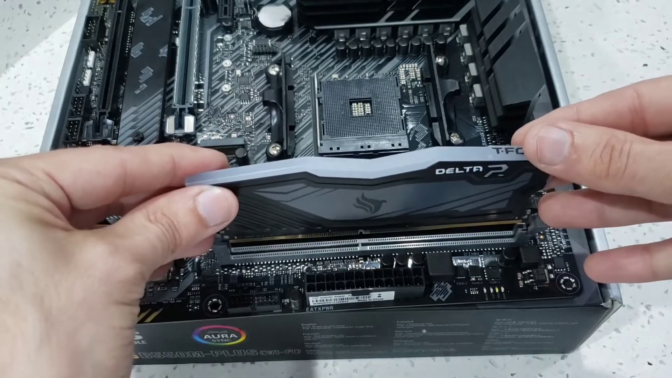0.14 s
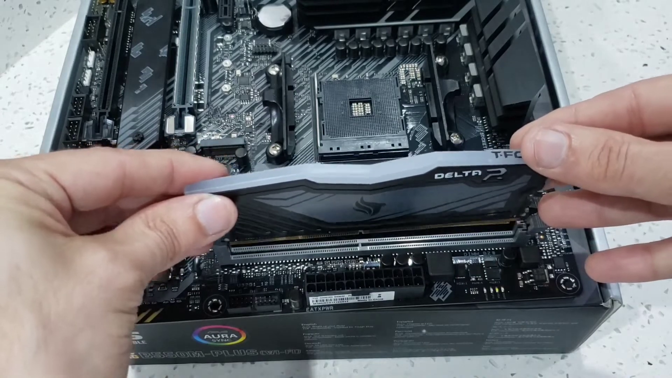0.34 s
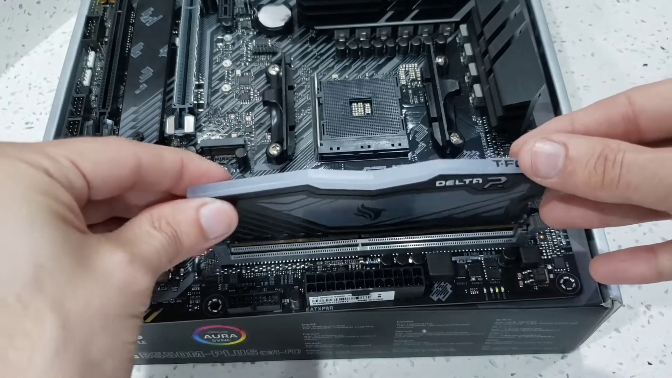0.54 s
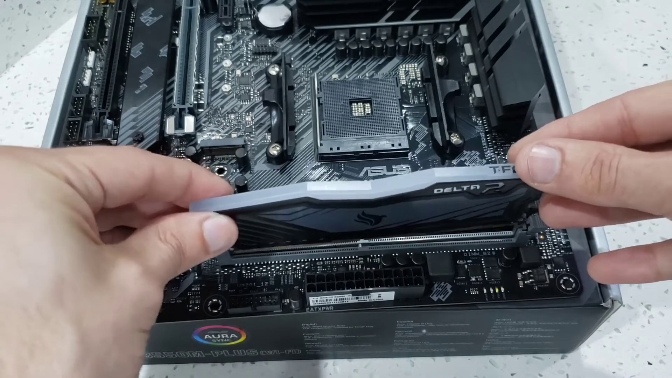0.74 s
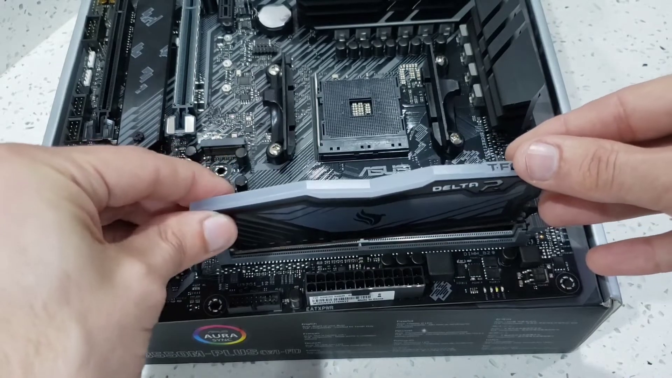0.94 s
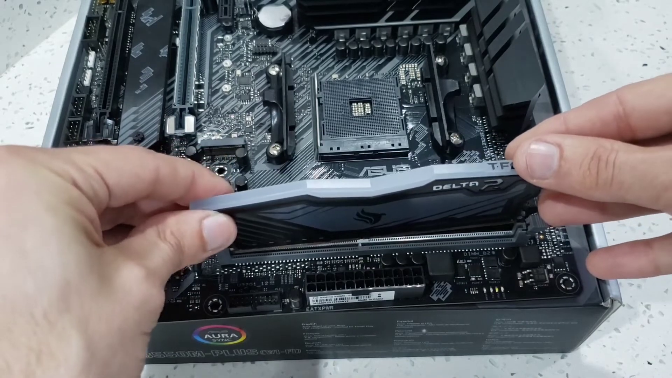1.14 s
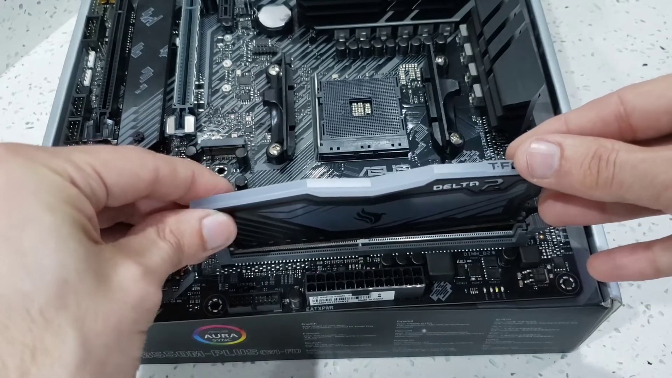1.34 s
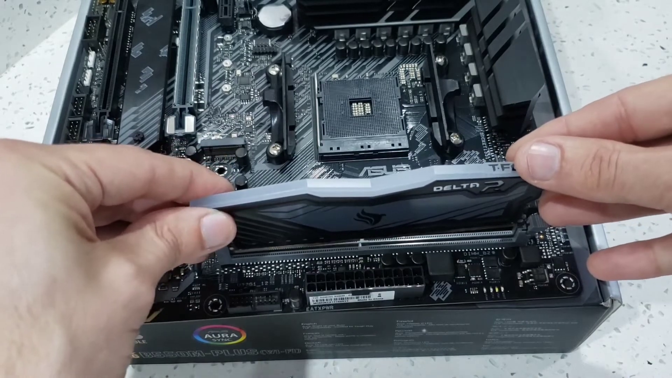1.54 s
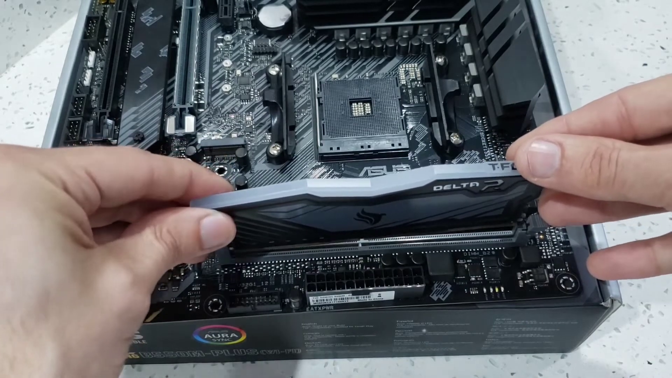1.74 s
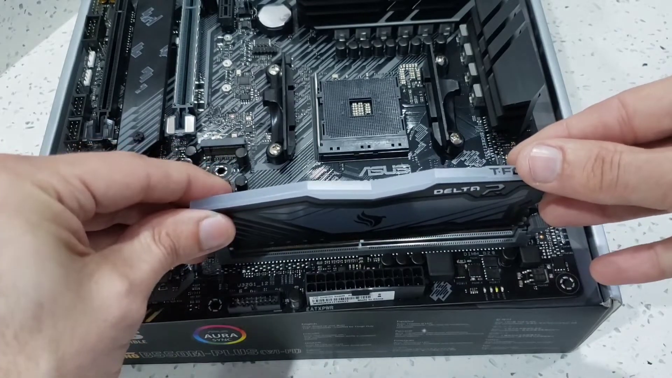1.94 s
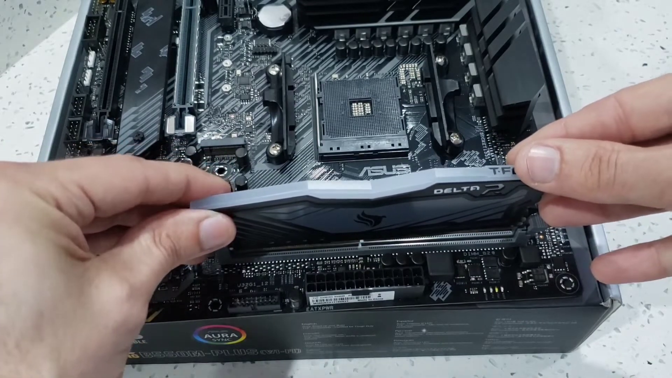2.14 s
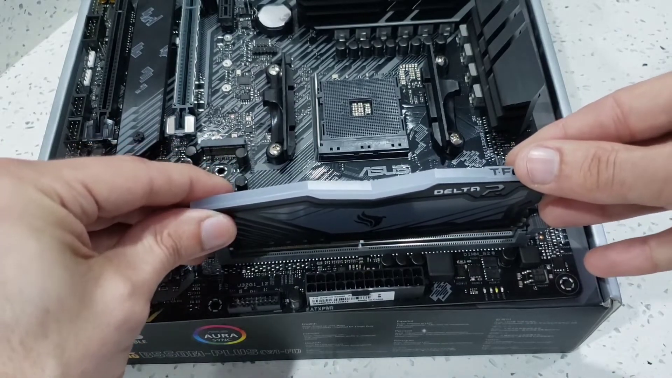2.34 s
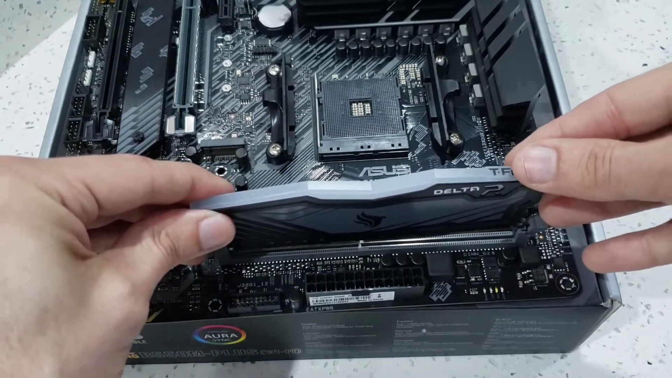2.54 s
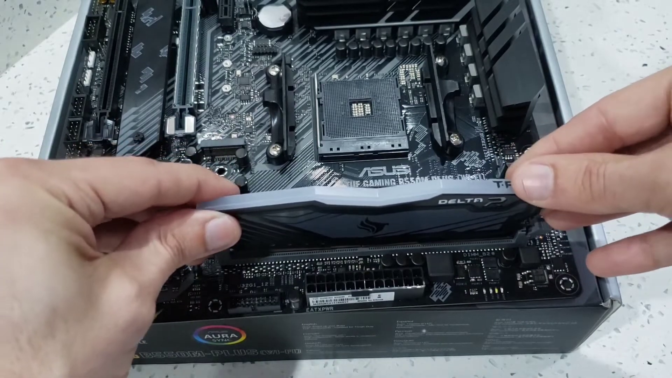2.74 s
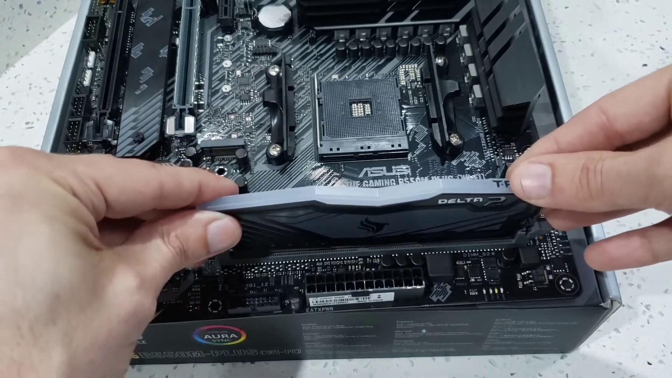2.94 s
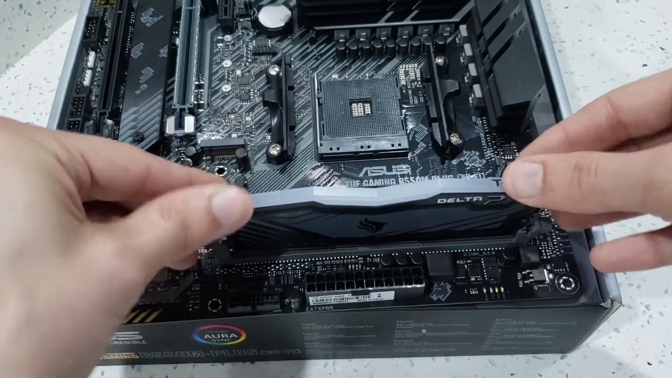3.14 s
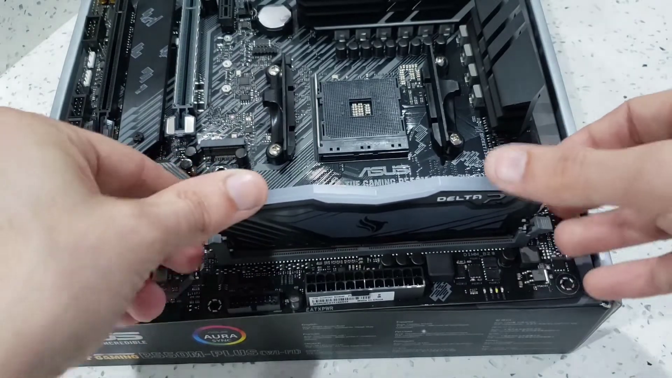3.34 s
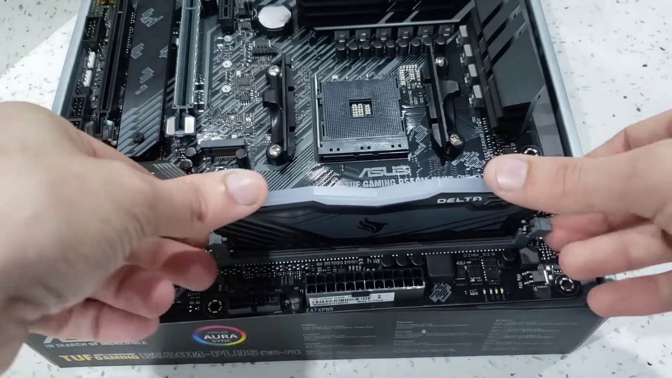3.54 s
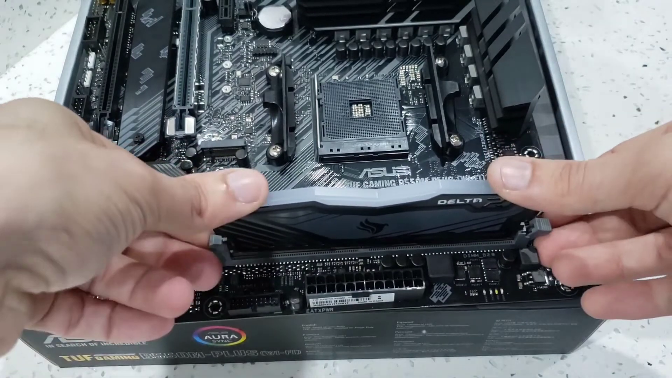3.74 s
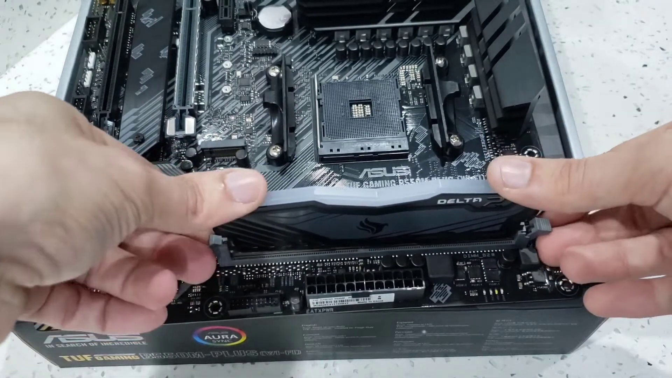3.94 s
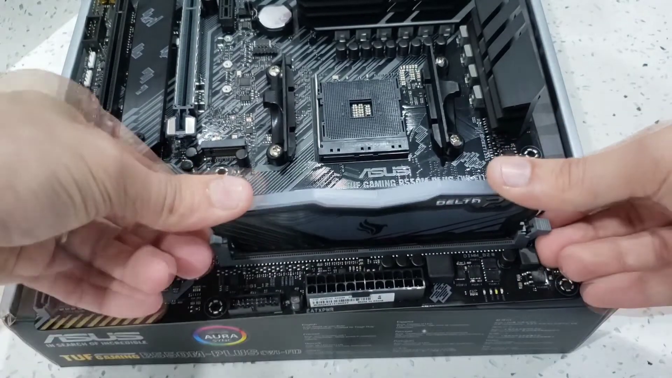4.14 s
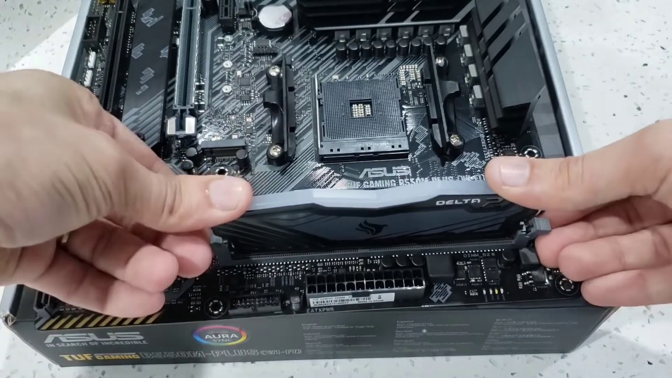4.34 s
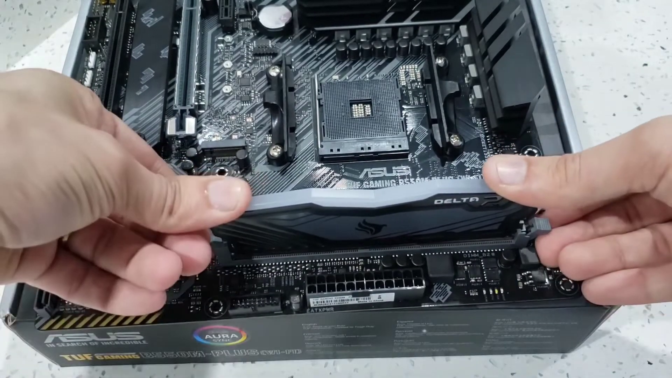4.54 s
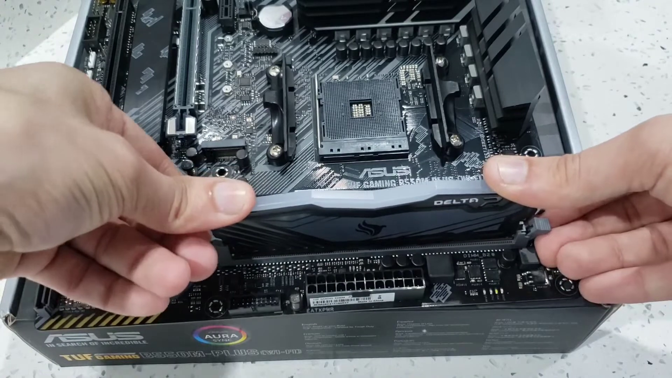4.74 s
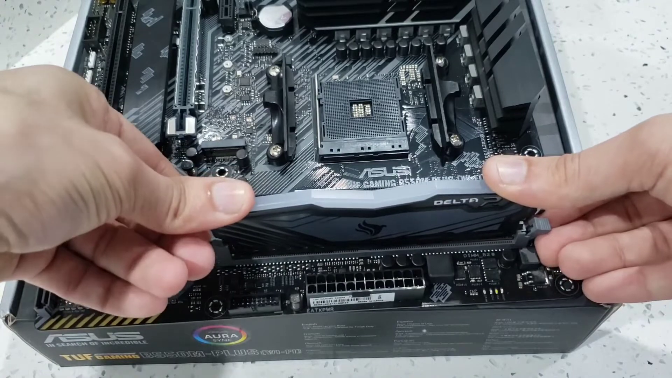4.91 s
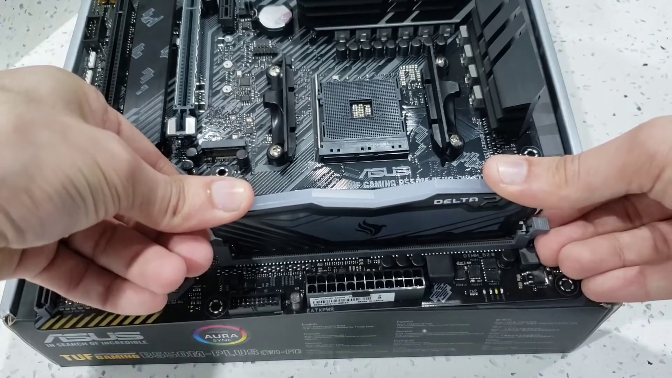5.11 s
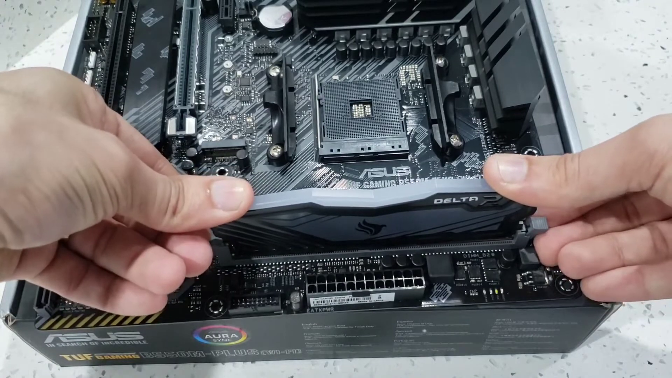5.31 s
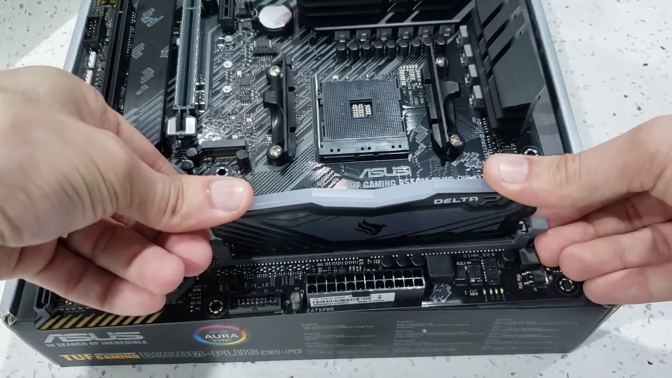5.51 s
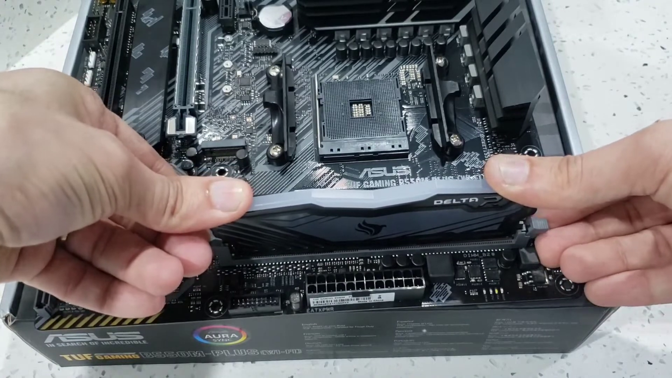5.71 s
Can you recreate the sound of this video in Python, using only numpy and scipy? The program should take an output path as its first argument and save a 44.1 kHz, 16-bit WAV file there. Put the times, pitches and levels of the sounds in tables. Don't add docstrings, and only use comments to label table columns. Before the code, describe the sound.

Soft plastic taps and scrapes on a circuit board lead to two sharp latch snaps in a hard-walled room with faint hum.

```python
import sys
import numpy as np
from scipy import signal
from scipy.fft import rfft, irfft, next_fast_len
from scipy.io import wavfile
from scipy.ndimage import uniform_filter1d, map_coordinates

SR = 44100
rng = np.random.default_rng(int(sys.argv[2]) if len(sys.argv) > 2 else 0)


def output_pcm(signal):
    pcm = np.clip(np.atleast_2d(signal).T, -1, 1) * 32767
    wavfile.write(sys.argv[1], SR, np.round(pcm).astype(np.int16))


def makeup_ratio(level_db):
    decades = np.asarray(level_db, float) / 20
    return 10 ** decades


N = 258867


def rms_one(x):
    return x / np.sqrt(np.mean(x ** 2) + 1e-20)


def at_hz(points, hz):
    points = np.array(points)
    return np.interp(np.log(hz + 1e-9), np.log(points[:, 0]), points[:, 1])


def level_curve(rows):
    s, level_db = np.transpose(rows)
    return np.interp(np.arange(N) / SR, s, level_db, left=-150, right=-150)


def drift(rate_hz):
    steps = int(N / SR * rate_hz) + 3
    return map_coordinates(rng.standard_normal(steps), [np.arange(N) / SR * rate_hz], order=3)


def band(x, low_hz, high_hz):
    return signal.sosfilt(signal.butter(2, [low_hz, high_hz], "band", fs=SR, output="sos"), x)


def high_pass(x, hz):
    return signal.sosfilt(signal.butter(4, hz, "high", fs=SR, output="sos"), x)


def ring(clicks, hz, t60):
    decay, w = makeup_ratio(-60 / (t60 * SR)), 2 * np.pi * hz / SR
    return signal.lfilter([0, np.sin(w)], [1, -2 * decay * np.cos(w), decay ** 2], clicks + 1e-18)


def click(s):
    return np.arange(N) == int(s * SR)


def struck(modes, s):
    return sum(makeup_ratio(level_db) * ring(click(s), hz, t60) for hz, level_db, t60 in modes)


# f/Hz, share in common (0 to 1)
PORT_LIKENESS = [(60, .97), (130, .9), (290, .8), (640, .6), (1410, .06), (3100, 0)]


def stereo_noise(spectrum, size):
    padded = next_fast_len(size)
    hz = np.fft.rfftfreq(padded, 1 / SR)
    alike = np.clip(at_hz(PORT_LIKENESS, hz), 0, 1)
    mid, side = rfft(rng.standard_normal((2, padded)))
    both = np.sqrt(1 + alike) * mid + np.sqrt(1 - alike) * side * [[1], [-1]]
    return rms_one(irfft(both * makeup_ratio(at_hz(spectrum, hz)), padded)[:, :size])


def plastic_contacts(contacts, colour, t60, chatter_s, lowest_hz):
    out, size = np.zeros((2, N)), SR // 25
    fade = np.exp(-np.arange(size) / SR / chatter_s)
    body, treble = 0, 0
    mode_hz = np.linspace(1100 ** .5, 16800 ** .5, 80) ** 2
    for hz in mode_hz * makeup_ratio(.06 * rng.standard_normal(80)):
        slips = rng.standard_normal((len(contacts), 2, size)) * fade
        mode = makeup_ratio(at_hz(colour, hz)) * ring(slips, hz, t60 * (4000 / hz) ** .25)
        if hz < 11000:
            body = body + mode
        else:
            treble = treble + mode
    body = high_pass(body, lowest_hz)
    body, treble = (x / np.abs(x).max(axis=2, keepdims=True) for x in (body, treble))
    for (s, peak_db, left_db, right_db), low, high in zip(contacts, body, treble):
        start = int(s * SR)
        beamed = makeup_ratio([[left_db], [right_db]]) * high
        out[:, start:start + size] += makeup_ratio(peak_db) * (low + beamed)
    return out


SHADED_TREBLE_DB = -6.5


def bounced(contacts, count, gap_s, growth, fade_db_per_s, treble_db):
    last_s, last_db, _ = contacts[-1]
    later = np.cumsum(gap_s * growth ** np.arange(count))
    rows = list(contacts) + [(last_s + s, last_db - fade_db_per_s * s, treble_db) for s in later]
    return [(s, peak_db, min(SHADED_TREBLE_DB + (peak_db < -38) * 6, 0), right_db)
            for s, peak_db, right_db in rows]


# t/s, peak level/dB, treble level/dB
FIRST_LATCH_CONTACTS = [
    (4.5505, -39, 4),
    (4.552, -38, 6),
    (4.5535, -37, 5),
    (4.5568, -16, -9),
    (4.5573, -16, 8),
    (4.5579, -16, 9),
    (4.559, -17, 2),
    (4.5602, -17, -2),
    (4.5613, -15, -4),
    (4.5628, -16, -2),
]
# f/Hz, level per mode/dB
FIRST_LATCH_COLOUR = [(1200, -30), (1600, -14), (2300, -7), (3200, -3), (4200, -3), (5500, 0), (7200, -6),
                      (9000, -6), (11000, -14), (12200, -15), (13200, -12), (14300, 0), (15000, -3),
                      (15700, -12), (16500, -30)]
# f/Hz, level/dB, t60/s
FIRST_LATCH_RING = [(2460, -46, .15), (4700, -48.5, .1), (12100, -45, 0.16), (14030, -44, .15),
                    (14600, -43.5, .15), (14840, -45.5, .12)]


def first_latch():
    contacts = bounced(FIRST_LATCH_CONTACTS, count=4, gap_s=.0016, growth=1.35, fade_db_per_s=650, treble_db=0)
    snap = plastic_contacts(contacts, FIRST_LATCH_COLOUR, t60=.008, chatter_s=.0004, lowest_hz=1200)
    return snap + struck(FIRST_LATCH_RING, 4.558) * makeup_ratio([[SHADED_TREBLE_DB], [0]])


# t/s, peak level/dB, treble level/dB
SECOND_LATCH_CONTACTS = [
    (5.1768, -26, 6),
    (5.1773, -21, 3),
    (5.1785, -23, 1),
    (5.1796, -23, -9),
    (5.1807, -21, -3),
]
# f/Hz, level per mode/dB
SECOND_LATCH_COLOUR = [(1350, -42), (1650, -16), (2200, -3), (2750, -14), (3300, -4), (4000, -4),
                       (4900, -13), (5800, -7), (7300, -11), (9000, -4), (11000, -7), (13000, -1),
                       (14300, -9), (15200, -1), (16000, 3), (16800, -2)]


def second_latch():
    contacts = bounced(SECOND_LATCH_CONTACTS, count=3, gap_s=.001, growth=1.6, fade_db_per_s=1000, treble_db=-1)
    return plastic_contacts(contacts, SECOND_LATCH_COLOUR, t60=.01, chatter_s=.0003, lowest_hz=1550)


# f/Hz, level/dB, t60/s
ARM_MODE = (2310, -52, 0.63)
# t/s, level/dB, share of the ring time
ARM_HITS = [
    (5.178, 0, 1.0),
    (3.666, -4, .3),
]
# pitch ratio, level/dB, share of the ring time
ARM_PARTNERS = [(1, -2, 1), (.97, 0, .25), (1.04, 0, .25), (1.017, -8, .8), (.985, -9, .6)]


def latch_arm():
    hz, level_db, t60 = ARM_MODE
    out = 0
    for s, hit_db, hit_share in ARM_HITS:
        for ratio, partner_db, partner_share in ARM_PARTNERS:
            tone = ring(click(s), hz * ratio, t60 * hit_share * partner_share)
            out = out + makeup_ratio(level_db + hit_db + partner_db) * tone
    return out


# t/s, peak level/dB, treble level/dB
SEATING_CONTACTS = [(2.584, -51, -15), (2.613, -45.5, -18), (2.698, -45, -3), (2.701, -51, -12),
                    (2.708, -42, -18), (2.714, -49, -18), (2.722, -57, -14), (2.731, -61, -15),
                    (2.749, -69, -15), (3.097, -56.5, -20), (3.6672, -52, -8), (3.669, -46.5, 7),
                    (3.681, -50, -16), (4.679, -43, 2), (4.684, -36.5, -10), (4.689, -41, -7),
                    (4.694, -48.5, -6)]
# f/Hz, level per mode/dB
SEATING_MODE_LEVELS = [(1200, 11.5), (1700, 12.5), (2300, 5), (3300, -10), (5000, 1.5), (7000, 10.5),
                       (10000, -29), (13000, 10), (16500, -22)]


def seating():
    contacts = [(s, peak_db, treble_db, treble_db) for s, peak_db, treble_db in SEATING_CONTACTS]
    return plastic_contacts(contacts, SEATING_MODE_LEVELS, t60=.022, chatter_s=.003, lowest_hz=800)


# f/Hz, level/dB, t60/s
MODULE_MODES = [(1800, -62, 0.046), (2150, -51.5, 0.044), (2390, -53, 0.076), (2510, -63, .05),
                (3520, -57, .04), (7100, -54, .04)]


def module_ring():
    return struck(MODULE_MODES, 3.6665)


# f/Hz, level/dB, t60/s
PANEL_MODES = [(334, -6.5, 0.054), (429.4, -1, 0.095), (462, -8, 0.11), (503, -13, 0.07)]
TABLE_MODES = [(64.6, -8.5, 0.075), (93, 5.5, 0.11)]
BOX_MODES = [(123.4, 2, 0.11), (140, -2, 0.13), (185.4, -10, 0.055)]
LID_MODES = [(254.5, -8, 0.088), (253.7, 1.5, 0.11), (299, 1.5, 0.036)]
BOARD_MODES = [(635.6, -8, 0.1), (661, -2, 0.07), (760, -0.5, 0.06), (900, -7, 0.03), (1030, -4.5, 0.055),
               (1190, -14, 0.025)]
TOUCH_KNOCKS = [(0.275, -61.5, 16.5, 10.5, -4), (0.385, -54.5, 5, 4.5, -8.5), (0.562, -54, 6.5, -3, -3),
                (0.586, -59, 17.5, 0.5, 6.5), (0.615, -48.5, -21, 0.5, -0.5), (0.719, -46.5, -28, 2, -7.5),
                (0.732, -53.5, -16, 3, -14), (0.749, -60, -14, 5.5, -10), (0.775, -59, -14, -2, -9),
                (0.81, -60.5, -17, 0.5, -10), (1.128, -52.5, -4, 2.5, -6.5), (1.264, -57, -7, 8, -8),
                (1.409, -48, -12, -19, -24), (1.468, -57, -20, -21, -26), (1.872, -51, -5.5, -2.5, -10.5),
                (1.9, -52.5, -11, 5, -20), (1.997, -48.5, -20, 4, -28)]
PUSH_KNOCKS = [(2.567, -53, 12, 11, -5), (2.582, -49, 6, 9.5, -6), (2.595, -52, 5, 11.5, 0),
               (2.609, -48, 16.5, 15, 0), (2.698, -50.5, -22, 11.5, 2), (2.708, -39, -22, -5, 1),
               (2.719, -40.5, 9, -12, -13), (2.733, -59, -8, -1, 3), (2.75, -55, -7, 0, -5),
               (2.957, -68, 20.5, 12, -5), (3.018, -52.5, 9.5, 2.5, -8), (3.098, -36.5, 4, -13, -9),
               (3.106, -36.5, -17, -22, -15), (3.652, -44.5, -9, -9, -5), (3.663, -37, -28, 1, -13),
               (3.675, -38, 8.5, 1, -13.5), (4.174, -56.5, -2, 2, -3)]
RECOIL_KNOCKS = [(4.553, -44.5, -4.5, -8, 1), (4.557, -26.5, -5.5, -19.5, -2.5),
                 (4.565, -36.5, -17, -3, -7.5), (4.589, -40, -1.5, -16.5, -10), (4.617, -46, -1, -10, -3),
                 (4.654, -53.5, 3.5, -16, 4), (4.68, -48, -4, -4, 1.5), (4.699, -55, 7, -15, -13),
                 (5.176, -51.5, 0.5, -2, 6.5), (5.824, -62.5, 2.5, -2, -5), (5.851, -56.5, -3.5, -4, -14.5)]
TABLE_OVER_BOX = [11, -6, 4.5]


def knocks():
    out, time = np.zeros((2, N + SR)), np.arange(SR // 4) / SR
    parts = (PANEL_MODES, TABLE_MODES, BOX_MODES, LID_MODES, BOARD_MODES)
    modes = np.array([(part, *mode) for part, table in enumerate(parts) for mode in table])
    part, hz, level_db, t60 = modes.T[:, :, None]
    part = part.astype(int)
    heavy = hz < 200
    for group, table_db in zip((TOUCH_KNOCKS, PUSH_KNOCKS, RECOIL_KNOCKS), TABLE_OVER_BOX):
        for s, panel_db, weight_db, lid_db, board_db in group:
            strength_luck, sign_luck, grip, delay_luck = rng.standard_normal((4, len(modes), 1))
            since = np.maximum(time - 0.002114 * np.abs(delay_luck) * (hz > 200), 0)
            reach_db = np.array([0, weight_db + table_db, weight_db, lid_db, board_db])[part]
            strength = makeup_ratio(panel_db + reach_db + level_db - 2.5 + strength_luck)
            strength = strength * np.where(heavy, -1, np.sign(sign_luck))
            swell = 1 - np.exp(-since * hz * 2.8)
            tone = np.sin(2 * np.pi * hz * (1 + .02 * grip) * since)
            rings = strength * swell * makeup_ratio(-60 * since / t60) * tone
            uneven = (grip * hz / 3000 * rings).sum(axis=0)
            start = int(s * SR)
            out[:, start:start + len(time)] += rings.sum(axis=0) + uneven * [[1], [-1]]
    return out[:, :N]


# t/s, treble level/dB, rise to 20 dB/s, fall per 20 dB/s, dull level/dB
RUB_STROKES = [(0.394, -70, .06, .05, -3), (0.563, -60, .007, .04, -8), (0.578, -50, .008, .07, -4),
               (0.602, -58, .025, .03, -2), (0.64, -72, .03, .08, -8), (1.415, -76, .08, .02, -1),
               (1.542, -76, .05, .2, -5), (1.852, -70, .05, .2, -12), (2.562, -59, .007, .14, -11),
               (2.6, -56.5, .03, .07, -7), (2.7, -56, .025, .075, -9), (3.01, -69.5, .07, .1, -4),
               (3.097, -63, .012, .025, -2), (3.322, -73, .008, .02, 0), (3.655, -65, .012, .03, -8),
               (3.668, -49, .004, .02, -7), (3.69, -64, .02, .14, -7), (4.178, -64.5, .016, .04, -3),
               (4.5525, -42, .008, .007, -3)]
# f/Hz, width/Hz, level/dB
RUB_SONG = [(3456, 470, -14), (5030, 400, -10), (5870, 500, -5.5), (6800, 370, -9.5), (10150, 390, -4.5),
            (11800, 350, 0.5), (13600, 400, 4.5), (14700, 400, -6)]


def rubs():
    grains = rng.standard_normal((2, N)) * makeup_ratio(3.0 * rng.exponential(1, (2, N)))
    s, peak_db, rise_s, fall_s, dull_db = np.transpose(RUB_STROKES)[:, :, None]
    since = np.arange(N) / SR - s
    strokes = makeup_ratio(peak_db - 20 * np.where(since < 0, (since / rise_s) ** 2, since / fall_s))
    bright = strokes.sum(axis=0)
    dull = (makeup_ratio(dull_db) * strokes).sum(axis=0)
    clump_db, song = 3.5, []
    for hz, width_hz, level_db in RUB_SONG:
        voice = rms_one(band(grains, hz - width_hz / 2, hz + width_hz / 2))
        song.append(makeup_ratio(level_db + clump_db * drift(45)) * voice)
    edge_song = makeup_ratio(-10) * bright * rms_one(sum(song[2:]))
    body_song = makeup_ratio(-13) * dull * rms_one(sum(song[:2]))
    top = makeup_ratio(-1.5 + 1.5 * drift(120)) * bright * rms_one(band(grains, 9300, 15500))
    middle = makeup_ratio(-8 + 1.6 * drift(120)) * bright * rms_one(band(grains, 5200, 7700))
    body = makeup_ratio(-1.5 + clump_db / 2 * drift(120)) * dull * rms_one(band(grains, 1400, 6300))
    return edge_song + body_song + top + middle + body


# t/s, length/s, f/Hz, width/Hz, level/dB
FINGER_SLIDES = [
    (1.32, 0.2, 970, 300, -82.5),
    (1.54, 0.24, 1300, 270, -78.5),
    (1.29, 0.24, 1680, 460, -82.5),
    (1.55, 0.18, 3540, 580, -85),
    (3.6, 0.12, 1000, 200, -73),
    (3.3, 0.22, 1650, 200, -79),
    (3.27, 0.28, 1900, 220, -79),
    (3.492, 0.082, 6840, 790, -73.5),
    (3.52, 0.19, 3730, 570, -80),
    (5.67, 0.2, 3570, 550, -83),
]
# t/s, level/dB
HAND_BUSTLE = [(0.0, -1.5), (0.3, -2), (0.6, 1), (1.05, -1.5), (1.35, 1.5), (1.7, 1), (1.96, 1.5),
               (2.2, -1), (2.53, -1.5), (2.63, 4), (2.94, -2.5), (3.12, 2.5), (3.3, 2), (3.48, 2),
               (3.9, -2.5), (4.12, -1.5), (4.25, 2), (4.45, -1), (4.64, 0), (4.95, -5), (5.87, -5)]


def slides():
    white, time, out = rng.standard_normal((2, N)), np.arange(N) / SR, 0
    for s, length_s, hz, width_hz, level_db in FINGER_SLIDES:
        swell = np.sqrt(np.sin(np.pi * np.clip((time - s) / length_s, 0, 1)) + 1e-12)
        out = out + makeup_ratio(level_db) * swell * rms_one(band(white, hz - width_hz / 2, hz + width_hz / 2))
    stir = (white[0] + 0.26 * white) * makeup_ratio(5.1 * level_curve(HAND_BUSTLE) + 3.1 * drift(15))
    rustle = sum(makeup_ratio(level_db) * ring(stir, hz, t60 / 2) for hz, level_db, t60 in PANEL_MODES)
    return out + makeup_ratio(-72.5) * rms_one(rustle)


def even_click(s, colour, level_db):
    padded = next_fast_len(N)
    hz = np.fft.rfftfreq(padded, 1 / SR)
    return irfft(makeup_ratio(at_hz(colour, hz) + level_db) * np.exp(-2j * np.pi * hz * s), padded)[:N]


# f/Hz, level/dB
FIRST_SNAP_ECHO = [(300, -23.5), (800, -5), (1300, -8.5), (2000, -3.5), (3000, -1), (4200, -6), (6000, 0.5),
                   (8000, -3), (10000, -7), (11000, -1.5), (12000, -0.5), (13000, -10), (14400, -5),
                   (15300, -11), (16500, -15)]
SECOND_SNAP_ECHO = [(300, -11), (750, -9), (1250, -19), (1900, -6), (2300, 1.5), (2800, -2), (3300, 1),
                    (3700, 3), (4300, -7), (5000, -6.5), (6000, 3), (9000, -5.5), (10800, 0), (12000, -1.5),
                    (14500, -9.5), (15600, -3), (16500, -8)]


def snaps_to_walls():
    return even_click(4.56, FIRST_SNAP_ECHO, 9.33) + even_click(5.179, SECOND_SNAP_ECHO, -0.74)


# f/Hz, t60/s
ROOM_DECAY = [(100, 0.9), (400, 0.48), (1500, 0.39), (5000, 0.44), (9000, 0.42), (15000, 0.35)]
# f/Hz, level/dB
ROOM_LEVELS = [(100, -13), (400, -8), (1200, -5.5), (2500, -7), (6000, -11), (10000, -11.5), (15000, -9.5)]


def room(x):
    size, echoes = SR * 3 // 4, 0
    time, white = np.arange(size) / SR, stereo_noise([(20, 0), (20000, 0)], size)
    edges = 60 * 2 ** np.arange(0, 8.3, .5)
    for low, high in zip(edges, edges[1:]):
        hz = np.sqrt(low * high)
        decay_db = at_hz(ROOM_LEVELS, hz) - 60 * time / at_hz(ROOM_DECAY, hz)
        echoes = echoes + band(white, low, high) * makeup_ratio(decay_db)
    echoes = echoes * np.clip((time - .004) / .008, 0, 1) * makeup_ratio(-17)
    return signal.fftconvolve(x, echoes, axes=1)[:, :N]


# f/Hz, level per Hz/dB
LOW_RUMBLE_SPECTRUM = [(30, -41), (48, -16.5), (65, -3.5), (110, 5.5), (170, -7), (220, -17.5),
                       (300, -48.5)]
UPPER_RUMBLE_SPECTRUM = [(130, -33.5), (190, -1.5), (260, 2.5), (350, -4), (450, -11.5), (600, -16),
                         (800, -21.5), (1100, -28), (1600, -28), (2500, -44), (5000, -58)]
HISS_SPECTRUM = [(300, -9), (1000, -10.5), (2000, -6.5), (3500, -9), (5000, -13), (7000, -7.5), (9000, -16),
                 (9600, -13), (11000, -5), (12000, 0.5), (13300, -4.5), (14100, -6.5), (14600, -17),
                 (15200, -21.5), (16500, -24.5)]
# t/s, level/dB
BACKGROUND_LEVEL = [(0.0, -1.5), (0.46, 3), (1.96, 2.5), (2.3, 0.5), (3.0, 3), (3.35, 3), (3.6, 5.5),
                    (4.02, -2), (4.6, 2.5), (4.89, -4.5), (5.5, -5.5), (5.87, -2.5)]


def room_tone():
    bustle_db, background_db = level_curve(HAND_BUSTLE), level_curve(BACKGROUND_LEVEL)
    turn = 2 * np.pi * np.cumsum(59 * (1 + 0.0031 * drift(3.4))) / SR
    hum = makeup_ratio(-53 + 0.35 * background_db + 1.0 * drift(7.0) + 1.5) * np.sin(turn)
    rumble = makeup_ratio(-58 + 0.55 * bustle_db + 1.6 * drift(7.7) + 1.0) * stereo_noise(LOW_RUMBLE_SPECTRUM, N)
    upper = makeup_ratio(-63 + bustle_db + 0.76 * drift(12) - 1.5) * stereo_noise(UPPER_RUMBLE_SPECTRUM, N)
    hiss = makeup_ratio(-79.5 + 0.96 * background_db + 0.89 * drift(7.7)) * stereo_noise(HISS_SPECTRUM, N)
    return rumble + upper + hiss + hum


def peaking(x, peaks):
    for hz, width_hz, gain_db in peaks:
        w, a = 2 * np.pi * hz / SR, makeup_ratio(gain_db / 2)
        q = np.sin(w) * width_hz / hz / 2
        top = [1 + q * a, -2 * np.cos(w), 1 - q * a]
        bottom = [1 + q / a, -2 * np.cos(w), 1 - q / a]
        x = signal.lfilter(top, bottom, x)
    return x


# f/Hz, width/Hz, level/dB
LEFT_BOARD_SHADE = [(8600, 1500, -5), (12100, 6000, -7)]
RIGHT_BOARD_LIFT = [(15550, 1000, 5)]


def scene():
    snaps = first_latch() + second_latch()
    arm = latch_arm()
    near = knocks() + rubs() + seating()
    wet = room(makeup_ratio(-7.5) * band(near, 77, 8000) + snaps_to_walls() + makeup_ratio(-11.0) * arm)
    near = near + module_ring()
    left = peaking(near[0] + wet[0], LEFT_BOARD_SHADE)
    right = peaking(near[1], RIGHT_BOARD_LIFT) + wet[1]
    return np.array([left, right]) + snaps + makeup_ratio(-6.5) * arm + room_tone() + slides()


def band_limit(x):
    return signal.sosfilt(signal.butter(12, 17140, fs=SR, output="sos"), x)


# f/Hz, width/Hz, level/dB
LEFT_PORT_PEAKS = [(7320, 690, 9)]
RIGHT_PORT_PEAKS = [(12000, 1000, 7), (14600, 2900, 13)]


def record(dry):
    x = np.array([makeup_ratio(1.9) * peaking(dry[0], LEFT_PORT_PEAKS), peaking(dry[1], RIGHT_PORT_PEAKS)])
    x = high_pass(x, 46)
    x = 1.5 * np.tanh(x / 1.5)
    x = signal.sosfilt(signal.cheby2(8, 40, 17300, fs=SR, output="sos"), x)
    padded = next_fast_len(N)
    over = np.clip((np.fft.rfftfreq(padded, 1 / SR) - 15780) / 150, 0, 1)
    low = irfft(rfft(x, padded) * makeup_ratio(-25 * over), padded)[:, :N]
    very_top = x - low
    loud = uniform_filter1d(np.abs(very_top).max(axis=0), size=256)
    mix = low + very_top * np.clip(loud / makeup_ratio(-36) - 1, 0, 1)
    return band_limit(mix)


dry = scene()
out = record(dry)
output_pcm(out)
```